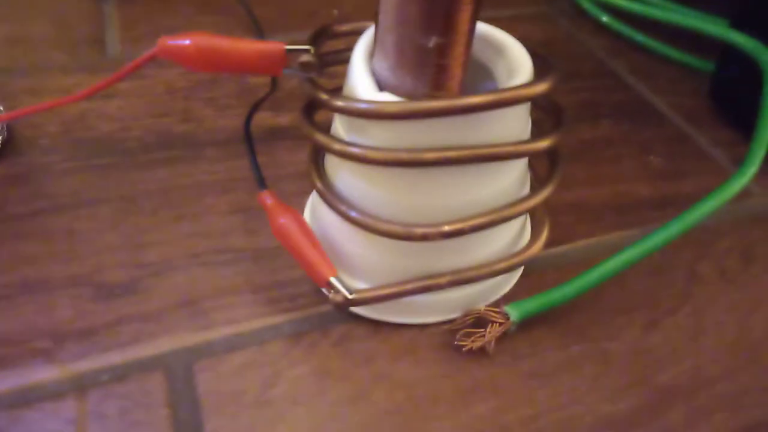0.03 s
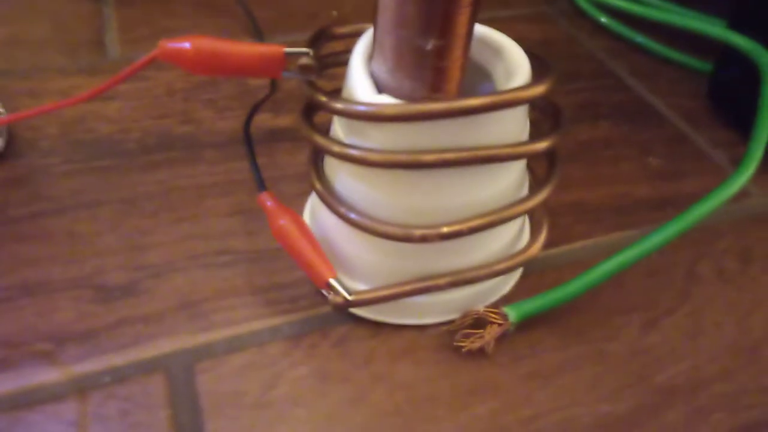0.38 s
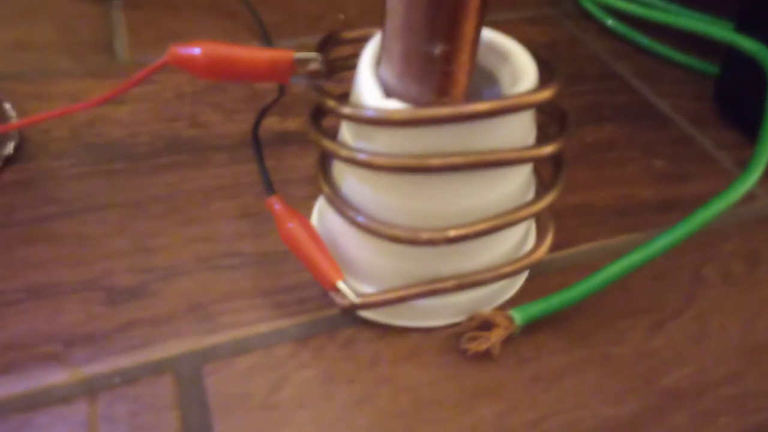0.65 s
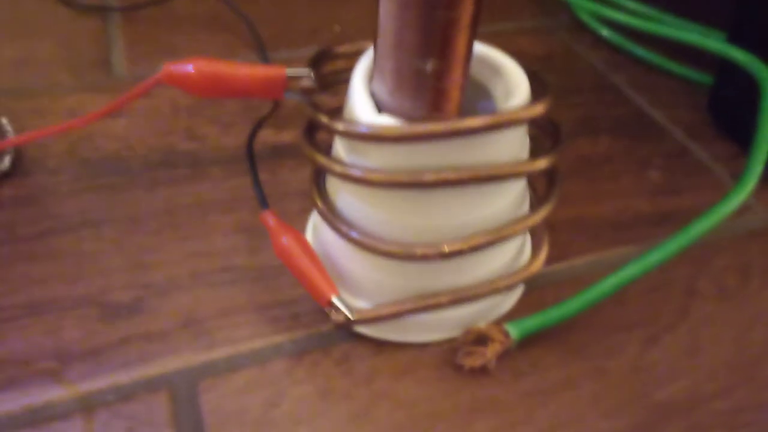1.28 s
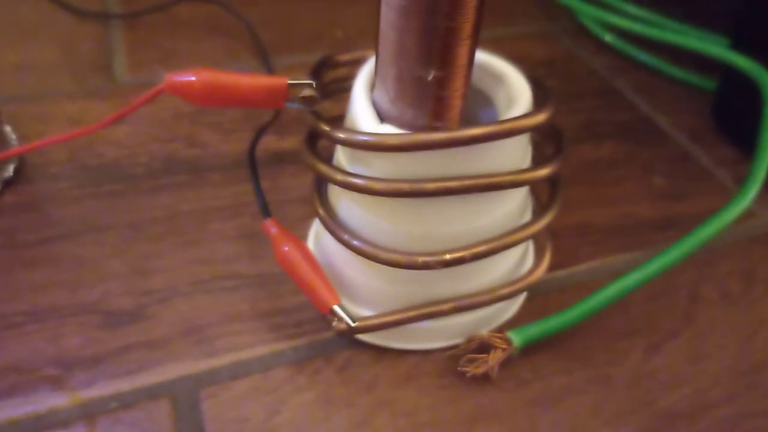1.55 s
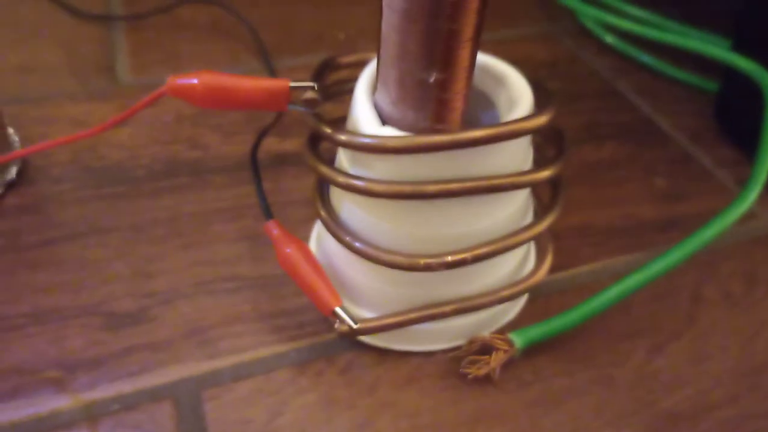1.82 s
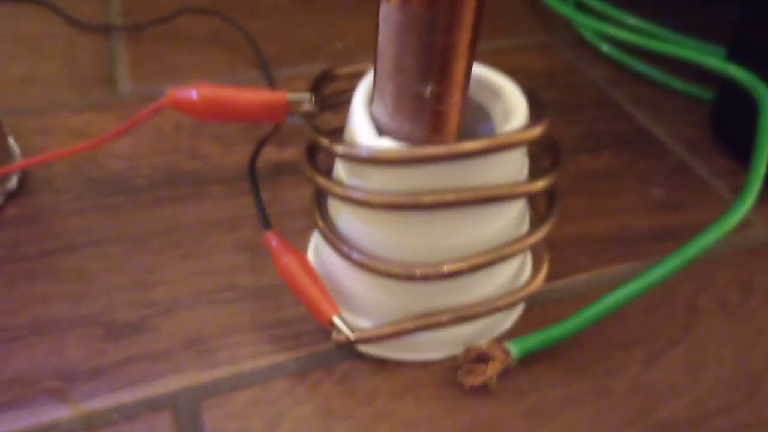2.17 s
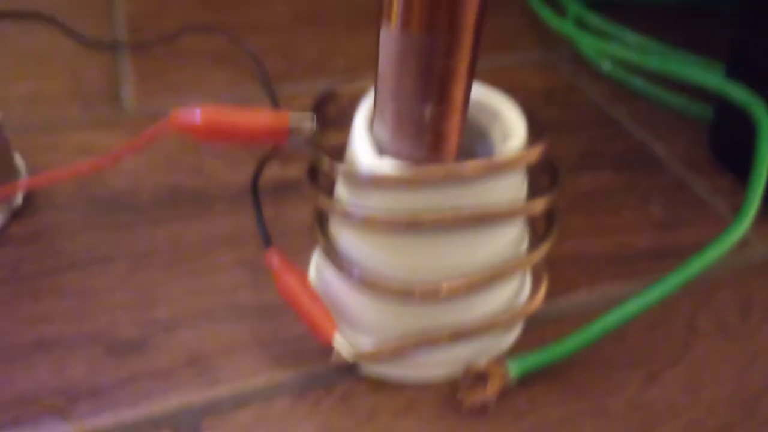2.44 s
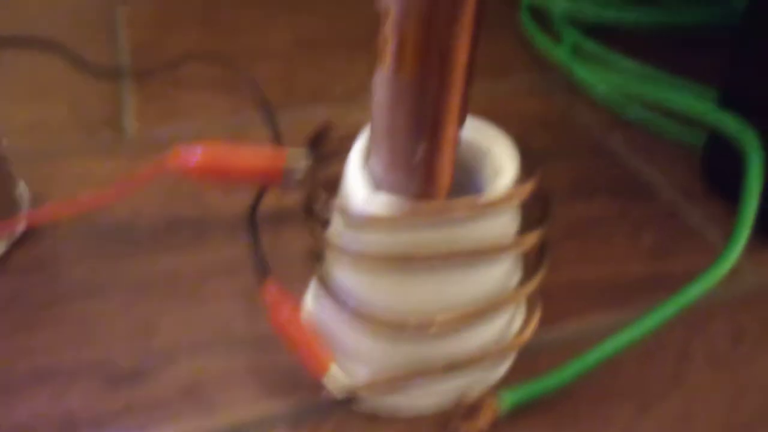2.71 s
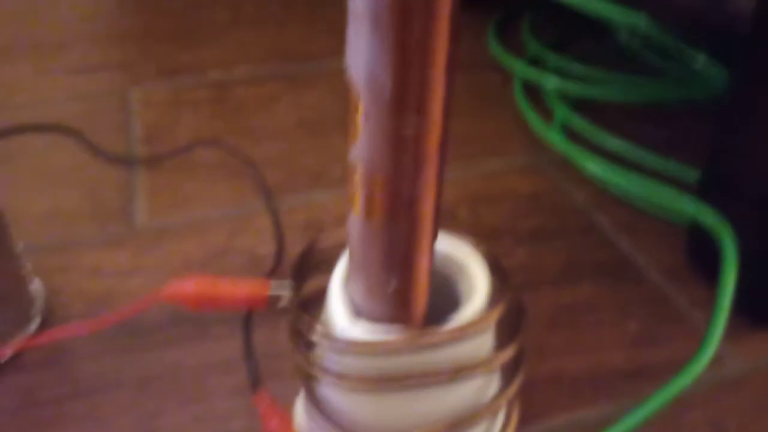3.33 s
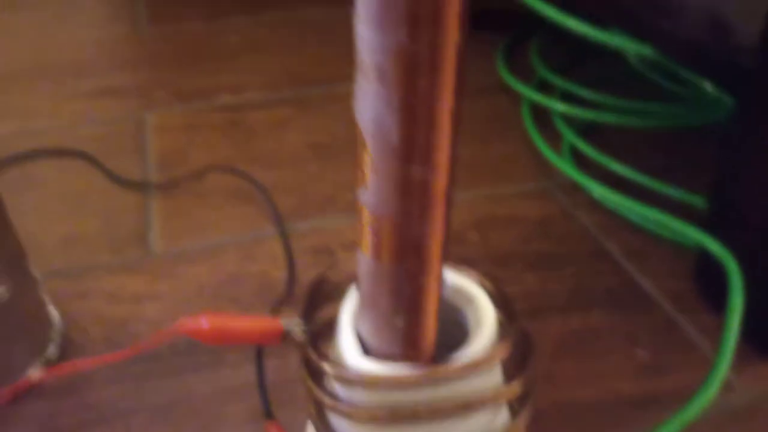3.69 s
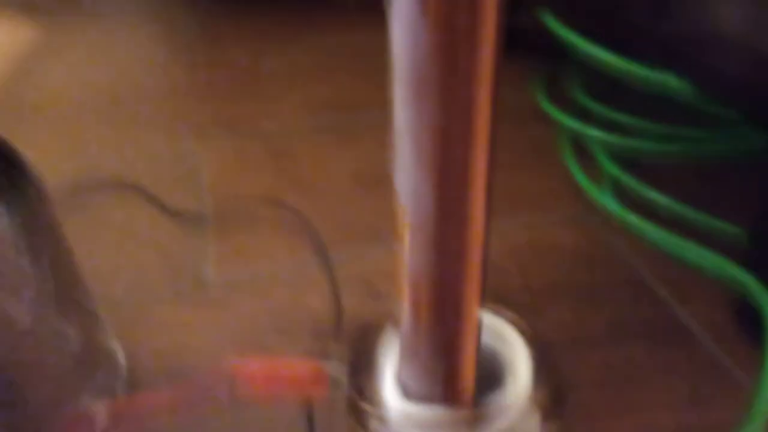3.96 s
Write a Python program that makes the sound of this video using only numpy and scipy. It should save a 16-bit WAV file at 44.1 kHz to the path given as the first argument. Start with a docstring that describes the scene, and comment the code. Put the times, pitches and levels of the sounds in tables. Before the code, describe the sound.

Loud electrical buzzing from a sparking coil, a rapid stream of sharp cracks indoors.

```python
"""A room with a wooden floor, close to a small coil driven by a spark gap.
The gap snaps about 74 times a second with a slight limp. Each spark is a sharp crack and a soft low
thump; some fire hard, some weakly. The rig rings faintly; nearby surfaces and the room throw the cracks
back. The hand-held microphone rumbles over a faint hiss; late on it is lifted, so the close echoes
arrive later and the top treble dulls."""
import sys
import numpy as np
from scipy import signal
from scipy.fft import rfft, irfft
from scipy.io import wavfile
from scipy.ndimage import uniform_filter1d, map_coordinates

SR = 44100
rng = np.random.default_rng(int(sys.argv[2]) if len(sys.argv) > 2 else 0)


def store_pcm(level_fs):
    """Save levels as 16-bit WAV."""
    pcm = np.round(np.clip(level_fs, -1, 1) * 32767).astype(np.int16)
    wavfile.write(sys.argv[1], SR, np.atleast_2d(pcm).T)


N = 176400
EDGE_HZ = 15900  # top of the recorder's band
# rise of the microphone: time_s, lift_share (0 low, 1 lifted)
MIC_LIFT = [(0, 0), (1.5, .08), (2.55, .17), (2.8, .31), (3.0, .5), (3.2, .72), (3.5, .88), (4, 1)]


def amp(db):
    """Decibels to gain."""
    return 10 ** (np.asarray(db) / 20)


def curve(points, s):
    """Reads a table over time."""
    return np.interp(s, *np.transpose(points))


def colour(points, hz, column=1):
    """Reads one dB column of a table over log frequency."""
    table = np.transpose(points)
    return np.interp(np.log(hz + 1), np.log(table[0] + 1), table[column])


def add(mix, at, sound):
    """Mixes a sound in from a given sample on."""
    part = mix[max(at, 0):][:len(sound)]
    part += sound[:len(part)]


def sharpest_click(db):
    """Minimum-phase spectrum: the sharpest click that has this colour."""
    log_gain = np.log(amp(np.concatenate([db, db[-2:0:-1]])))
    return np.exp(np.conj(signal.hilbert(log_gain)))[:len(db)]


def room_tone(level_db=-46):
    """The room's low rumble and faint hiss."""
    # colour of the background: frequency_hz, relative_db
    spectrum = [(20, -32), (32, -39), (45, -11), (65, -12.5), (100, -1), (160, -10), (300, -14),
                (600, -22.5), (2000, -19), (8000, -29), (16000, -44)]
    hz = np.fft.rfftfreq(N, 1 / SR)
    noise = irfft(rfft(rng.standard_normal(N)) * amp(colour(spectrum, hz)), N)
    return amp(level_db) * noise / noise.std()


def rumbles(kicks, half_width_octaves=1.01, steady=.11, throb_s=.0018):
    """Low rumbles and low-mid swells that throb with the sparks."""
    # low rumbles and low-mid swells: middle_s, length_s, pitch_hz, level_db
    swells = [(0.24, 0.079, 112.5, -48.5), (0.447, 0.021, 130, -52), (0.949, .05, 127, -48),
              (1.652, 0.34, 160, -46.5), (2.01, 0.28, 141, -43.5), (2.258, 0.14, 105, -47.5),
              (2.688, 0.12, 159, -49), (2.87, 0.11, 128, -44.5), (3.033, .05, 115, -44),
              (3.02, .2, 270, -48.5), (3.306, 0.11, 427, -48), (3.75, 0.17, 103, -42.5)]
    t, hz, out = np.arange(N) / SR, np.fft.rfftfreq(N, 1 / SR), np.zeros(N)
    throb = signal.lfilter([1], [1, -np.exp(-1 / (throb_s * SR))], kicks)
    for s, length, pitch_hz, db in swells:
        band = 1 / (1 + abs(np.log2((hz + 1) / pitch_hz) / half_width_octaves) ** 6)
        noise = irfft(rfft(rng.standard_normal(N) * (steady + throb)) * band, N)
        envelope = np.exp(-(2 * (t - s) / length) ** 6)
        swell = noise * envelope
        out += amp(db) * swell * np.linalg.norm(envelope) / np.linalg.norm(swell)
    return out


def tail(t60_s, level_db, onset_s, size=16384):
    """A dense run of dying reflections, evened out and given the colour of the room."""
    # colour of the reverberation: frequency_hz, relative_db
    spectrum = [(100, -8), (400, -9.5), (600, -21), (850, -16), (1080, -13.5), (1400, -1.5), (2000, -12),
                (3000, -7), (3900, -5), (4900, 0), (5850, 5), (6400, 3), (8000, -7.5), (10500, -5),
                (12300, -3.5), (13700, -9), (14700, 1.5), (15700, 7)]
    t, hz = np.arange(size) / SR, np.fft.rfftfreq(size, 1 / SR)
    taps = rfft(rng.choice([-1., 1.], size) * amp(-60 * t / t60_s))
    uneven_db = 10 * np.log10(uniform_filter1d(abs(taps) ** 2, 71))
    response = irfft(taps * sharpest_click(colour(spectrum, hz) - uneven_db))
    return amp(level_db) * np.pad(response, (int(onset_s * SR), 0))[:size]


def close_echoes(sound):
    """Surfaces near the coil add echoes whose notches sweep down as the microphone rises."""
    # echoes at the two microphone heights: low_delay_s, lifted_delay_s, low_gain, lifted_gain
    surfaces = [(.000378, .000408, -.23, .3), (.00048, .000628, .18, .41), (.000545, .000688, .19, .18),
                (.000715, .000849, .22, .18)]
    n, echoes = np.arange(N), np.zeros(N)
    lift = curve(MIC_LIFT, n / SR)
    for low_s, lifted_s, low_gain, lifted_gain in surfaces:
        delay_s = low_s + lift * (lifted_s - low_s)
        gain = low_gain + lift * (lifted_gain - low_gain)
        echoes += gain * map_coordinates(sound, [n - SR * delay_s], order=5)
    return sound + echoes


def reflections(kicks, heights=3, lift_boost_db=3.5):
    """Scatter from the rig and the room's tail; their patterns crossfade as the microphone rises."""
    lift = curve(MIC_LIFT, np.arange(N) / SR)
    scatter, room = np.zeros(N), np.zeros(N)
    for height in range(heights):
        share = np.cos(np.pi / 2 * np.minimum(abs(lift * (heights - 1) - height), 1))
        scatter += share * signal.fftconvolve(kicks, tail(t60_s=.019, level_db=-10, onset_s=.0009))[:N]
        room += share * signal.fftconvolve(kicks, tail(t60_s=.15, level_db=-13, onset_s=.003))[:N]
    return close_echoes(scatter * amp(lift_boost_db * lift)) + room


def ringing(kicks, size=8192):
    """The sparks keep a few modes of the rig ringing."""
    # modes of the rig, for a kick of gain 1: pitch_hz, level_db, t60_s
    modes = [(1337, -52.5, 0.13), (1317, -57, 0.13), (1453, -67, 0.14), (2085, -43.5, 0.02),
             (6500, -65, 0.035), (14900, -62, .03), (15100, -61, 0.044)]
    t = np.arange(size) / SR
    ring = sum(amp(db - 60 * t / t60) * np.sin(2 * np.pi * hz * t) for hz, db, t60 in modes)
    return signal.fftconvolve(kicks, ring)[:N]


def thumps(times, gains, pitch_hz=142, spread_octaves=.65, rise_s=.0017, lag_s=.00085, spread_db=1.5):
    """A low push of about one swing follows each spark, uneven in pitch, size and lag."""
    # weight of the thumps: time_s, relative_db
    levels = [(0, -43), (.55, -47), (1.2, -38.5), (1.65, -36.5), (1.85, -37), (2.02, -35), (2.25, -39),
              (2.5, -38.5), (2.7, -37.5), (2.92, -36), (3.15, -40.5), (3.35, -39), (3.55, -35),
              (3.75, -36.5), (4, -36)]
    t, out = np.arange(1500) / SR, np.zeros(N)
    envelope = t / rise_s * np.exp(1 - t / rise_s)
    draws = np.clip(rng.standard_normal((len(times), 3)), -2, 2)
    for s, gain, (pitch, loud, lag) in zip(times, gains, draws):
        hz = pitch_hz * 2 ** (spread_octaves * pitch)
        swing = envelope * np.sin(2 * np.pi * hz * (2 * rise_s - t))
        weight = gain * amp(curve(levels, s) + spread_db * loud)
        add(out, int((s + lag_s * abs(lag)) * SR), weight * swing)
    return signal.sosfilt(signal.butter(2, 75, "high", fs=SR, output="sos"), out)


def sizzle_db(s, hz, width_hz=500):
    """A peak in the cracks that swells and slides down while the microphone rises."""
    # path of the peak: time_s, centre_hz, boost_db
    peak = [(2.55, 5750, 0), (2.75, 5550, 2.5), (3.0, 5400, 1.5), (3.3, 5200, 0)]
    times, centres, boosts = np.transpose(peak)
    offset_hz = hz - np.interp(s, times, centres)
    return np.interp(s, times, boosts) * np.exp(-(offset_hz / width_hz) ** 2)


def cracks(times, gains, trim_db=-.5, body_spread_db=4.5, body_max_db=3.8, wander_db=1.7, size=1024):
    """Each spark snaps; every arc takes a new path, which colours it afresh."""
    # colour of a crack at the two microphone heights: frequency_hz, low_db, lifted_db
    spectrum = [(99, -27, -33), (432, -10, -10), (780, -4, -1.5), (1036, -10.5, -10), (1700, -6.5, -2.5),
                (2170, -7.5, -7), (2580, -1.5, -11), (3040, -5, -18), (3580, -13.5, -4.5),
                (3860, -6.5, -2.5), (4460, -1, -8.5), (5080, -6, -4), (5760, 0.5, 0.5), (6460, -6.5, 1.5),
                (7520, -2, -18), (8350, -10, -8), (9540, -9.5, -17), (10470, -17, -12), (12170, -8, -7),
                (14000, -11, -10), (14700, 5, -8), (15700, 0, -1)]
    # body of the cracks below about 4 kHz: time_s, boost_db
    body = [(0.02, 0.5), (0.07, -4.5), (0.14, -0.7), (0.25, 6), (0.33, 5.5), (0.37, -3), (0.43, 0.5),
            (0.5, 2), (0.55, 6), (0.62, -6), (0.69, 7), (0.8, -0.6), (0.92, 8), (0.98, -1.5), (1.02, 2.9),
            (1.07, -4.5), (1.13, 0.4), (1.19, 1.9), (1.25, 1.5), (1.36, 3.7), (1.38, 3.5), (1.55, 6.5),
            (1.63, -1), (1.71, 6), (1.78, 2.5), (1.91, 1), (1.95, -0.5), (2.07, 2), (2.13, 0.5), (2.19, 6),
            (2.23, -4.5), (2.26, 1.5), (2.44, 6.5), (2.47, -5), (2.52, 3.5), (2.59, -2.5), (2.65, 6),
            (2.7, 0), (3.0, 0.5), (3.14, -1.5), (3.19, 5.5), (3.54, 3.5), (3.94, 3), (3.98, -0.5)]
    hz, out = np.fft.rfftfreq(size, 1 / SR), np.zeros(N)
    low_db, lifted_db = colour(spectrum, hz), colour(spectrum, hz, column=2)
    knots_hz = np.arange(0, SR / 2, 550)
    treble_lag = np.exp(-1j * np.pi * .0004 * hz ** 2 / EDGE_HZ)  # 0.4 ms late at the band's edge
    body_draws = np.clip(rng.standard_normal(len(times)), -2, 1.2)
    for s, gain, draw in zip(times, gains, body_draws):
        mic_db = low_db + curve(MIC_LIFT, s) * (lifted_db - low_db)
        ceiling_db = body_max_db - 20 * np.log10(max(gain, 1))
        body_db = min(curve(body, s) + body_spread_db * draw, ceiling_db) / (1 + (hz / 4200) ** 4)
        bass_db = 7 * max(gain - 1, 0) / (1 + (hz / 1100) ** 4)  # hard sparks sound woodier
        path_db = wander_db * np.interp(hz, knots_hz, rng.standard_normal(len(knots_hz)))
        snap = treble_lag * sharpest_click(mic_db + body_db + bass_db + path_db + sizzle_db(s, hz))
        add(out, int(s * SR), gain * irfft(snap))
    return amp(trim_db) * out


def spark_gap(first_s=.0057, limp_hz=20.86, limp_s=.0015, first_limp_s=.0175, jitter_s=.00026,
              spread_db=.6, sag_db=1.1):
    """Times and gains of the sparks: they creep early, then slip late, every three or four sparks."""
    # firing rate of the gap: time_s, rate_hz
    rate = [(0.0, 72.946), (0.4, 73.158), (0.8, 72.803), (1.15, 74.021), (1.5, 73.605), (2.0, 73.907),
            (2.5, 73.514), (3.0, 73.653), (4.0, 73.58)]
    # sparks that fire unusually hard or weakly: time_s, relative_db
    odd_sparks = [(0.239, 2.5), (0.43, 2.2), (0.443, 2.5), (0.676, -4), (0.689, 2), (0.731, -3.5),
                  (0.745, 2), (0.923, 2.2), (0.937, 2.5), (1.018, 2), (1.14, -4), (1.153, 1.5),
                  (1.345, 1.5), (1.411, -3.5), (1.425, 2), (1.615, 2.2), (1.72, 2), (1.871, 2), (2.008, 2),
                  (2.496, -3), (2.508, 2.2), (2.971, 2.5), (3.339, 2), (3.666, 2.2), (0.156, -6.5),
                  (0.39, -8.7), (0.512, -5.1), (0.567, -5.3), (1.235, -10.9), (1.289, -7.8), (1.451, -5.9),
                  (1.492, -4.9), (1.52, -5.8), (1.534, -5.4), (1.642, -6.1), (1.859, -11.9), (2.17, -6.8),
                  (2.293, -6.0), (2.347, -10.3), (2.389, -5.0), (2.429, -6.3), (2.538, -11.3),
                  (2.632, -7.0), (2.769, -6.3), (2.959, -4.8), (3.025, -5.5), (3.066, -11.0), (3.08, -7.0),
                  (3.285, -8.7), (3.352, -12.6), (3.488, -9.0), (3.555, -9.7), (3.611, -7.1), (3.679, -5.5),
                  (3.815, -8.1), (3.856, -10.1), (3.924, -7.4)]
    t = np.arange(N) / SR
    cycles = np.cumsum(curve(rate, t)) / SR
    cycles -= np.interp(first_s, t, cycles)
    beats = np.interp(np.arange(int(cycles[-1]) + 1), cycles, t)
    jitter, strength, sag = rng.standard_normal((len(beats), 3)).T
    limp = (limp_hz * (first_limp_s - beats)) % 1 - .5
    times = beats + limp_s * limp + jitter_s * jitter
    db = spread_db * strength - sag_db * np.minimum(sag ** 2, 2)
    for s, odd_db in odd_sparks:
        db[np.argmin(abs(times - s))] = odd_db
    return times, amp(db)


def scene():
    """One train of sparks drives the buzz, over throbbing rumbles and room tone, in mono."""
    times, gains = spark_gap()
    kicks = np.zeros(N)  # one impulse a spark
    for s, gain in zip(times, gains):
        add(kicks, int(s * SR), np.array([gain]))
    buzz = close_echoes(cracks(times, gains)) + reflections(kicks) + ringing(kicks) + thumps(times, gains)
    return (buzz + rumbles(kicks) + room_tone())[None]


def record(dry):
    """The recorder's band limit."""
    lowpass = signal.firwin(511, EDGE_HZ, window=("kaiser", 9), fs=SR)
    return signal.oaconvolve(dry, lowpass[None], "same")


dry = scene()
out = record(dry)
store_pcm(out)
```